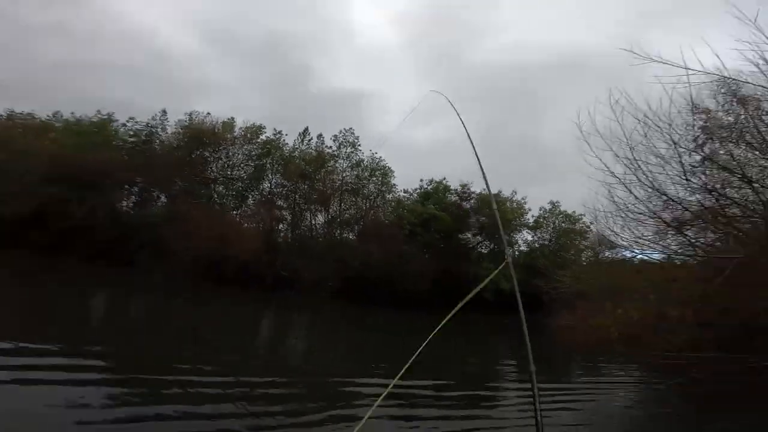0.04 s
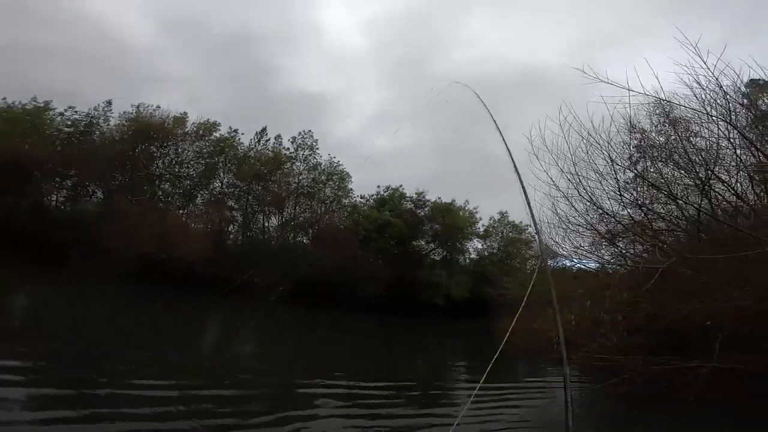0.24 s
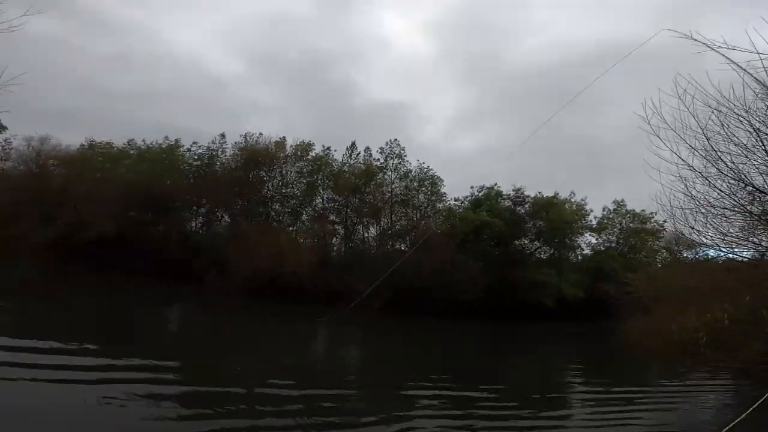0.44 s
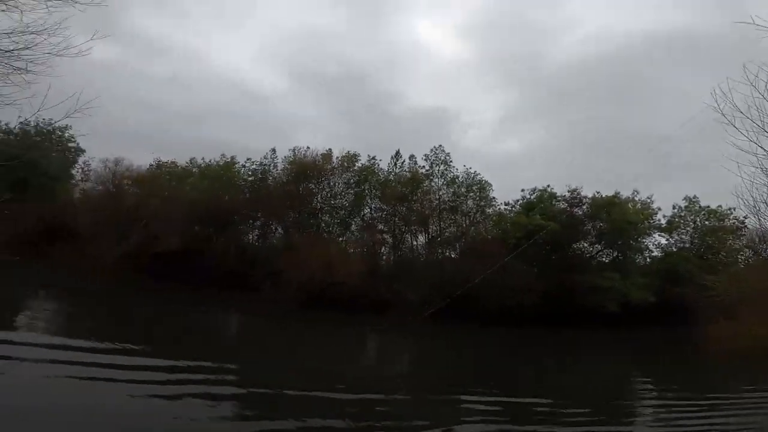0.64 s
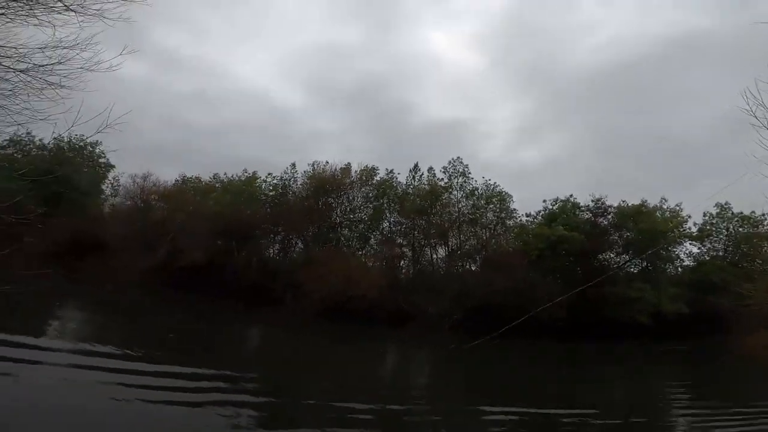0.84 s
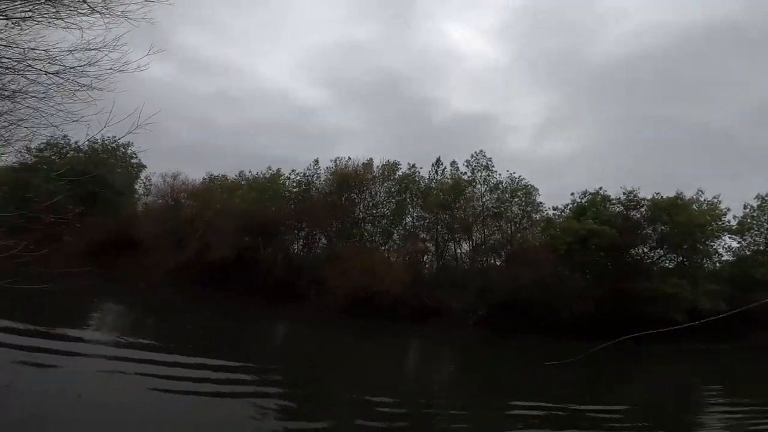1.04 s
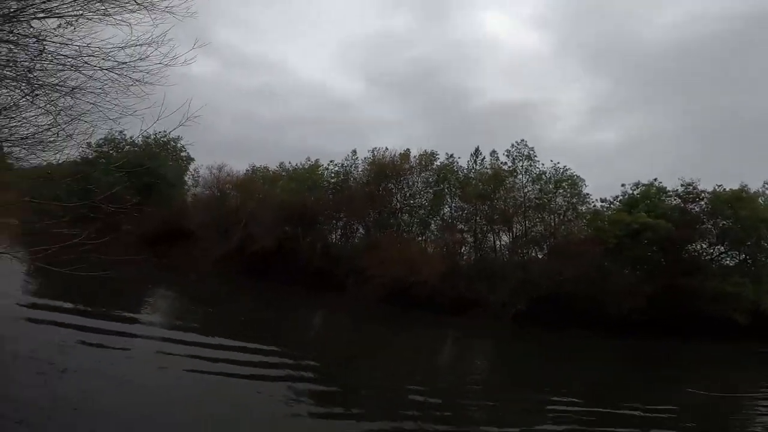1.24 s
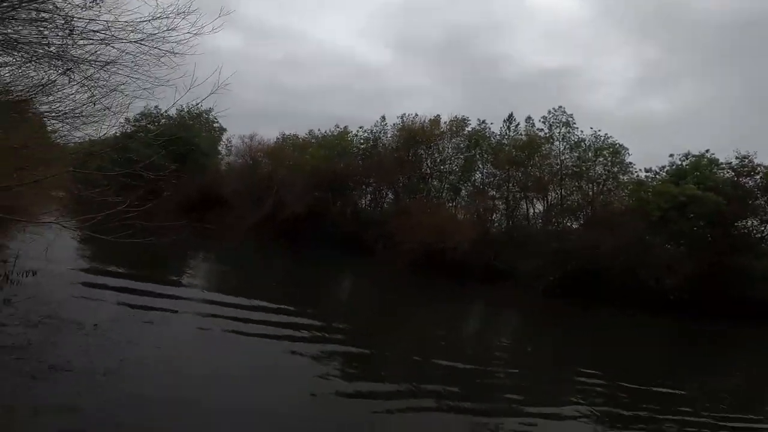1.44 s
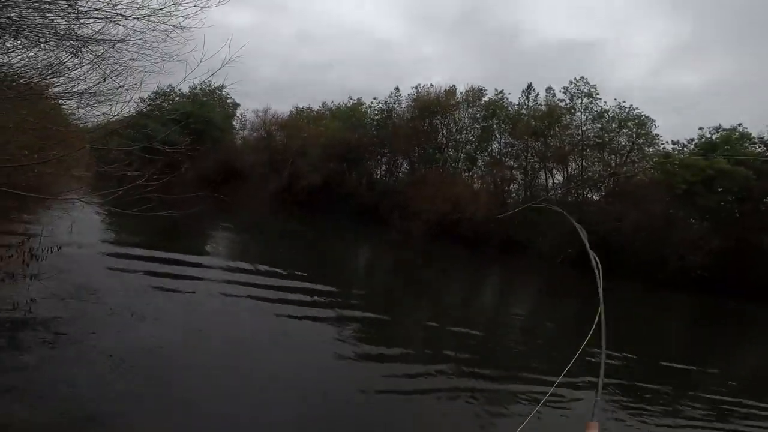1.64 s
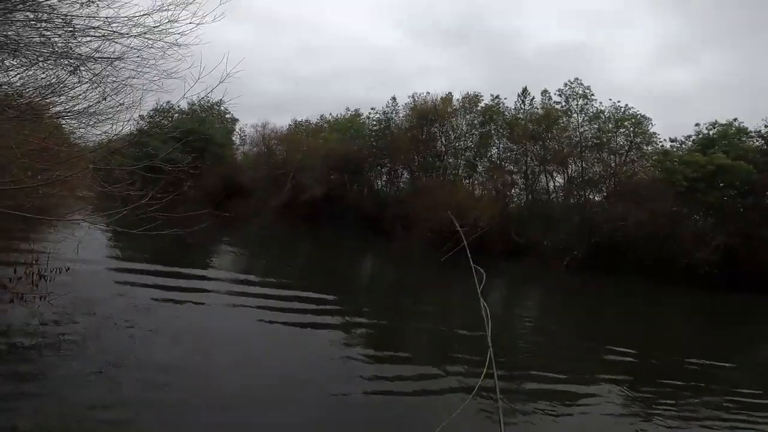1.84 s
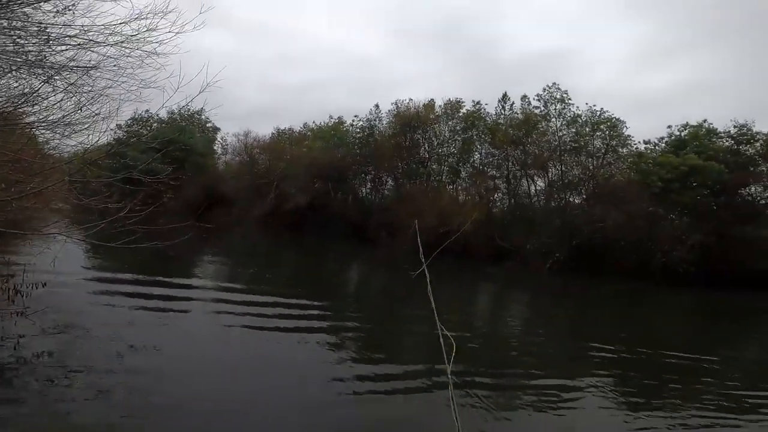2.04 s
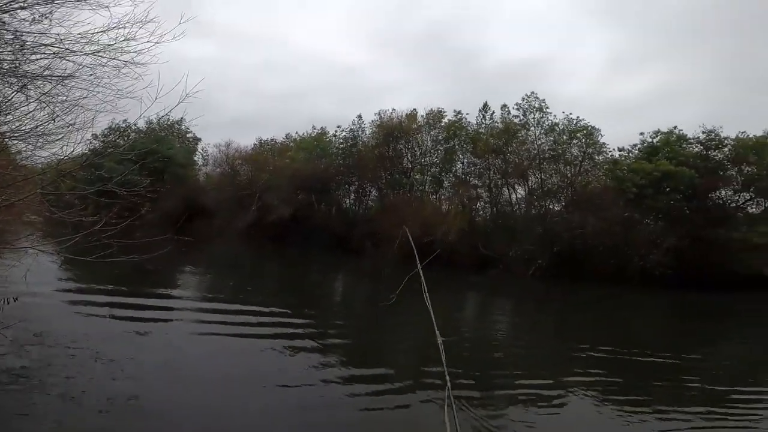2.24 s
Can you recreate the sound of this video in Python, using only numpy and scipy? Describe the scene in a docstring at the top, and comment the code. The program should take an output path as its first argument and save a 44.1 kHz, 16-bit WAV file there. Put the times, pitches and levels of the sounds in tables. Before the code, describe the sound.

A fly rod cast beside a river, heard from the angler's body. Soft line and sleeve rustles with fine crackles come in the first 0.5 s; low wind thumps and sharper ticks gather around 0.7-0.9 s. Lighter rustling follows from 1.1 s. The rod swishes at about 1.6 s, trailing a tiny rising whistle, then buffets, crackles and ticks fade by 2.3 s over steady quiet wash.

```python
"""A fly cast on a river bank, heard at two microphones worn by the angler.
The river washes steadily, as shaped noise, while air buffets the microphones with low noise and eddy pulses.
From the start line and sleeve rustle in strokes of grainy hiss, with fine crackles and damped, ringing ticks.
Then the rod swishes forward, a broad burst of noise, and narrow bands of noise whistle upward after it.
More crackles, ticks and strokes follow the cast."""
import sys
import numpy as np
from scipy import signal
from scipy.fft import rfft, irfft
from scipy.io import wavfile
from scipy.ndimage import uniform_filter1d, map_coordinates

SR = 44100
rng = np.random.default_rng(int(sys.argv[2]) if len(sys.argv) > 2 else 0)


def to_wav(s):
    """Save 16-bit WAV."""
    ch = np.atleast_2d(s).T  # columns
    pcm = np.round(np.clip(ch, -1, 1) * 32767)  # PCM
    wavfile.write(sys.argv[1], SR, pcm.astype(np.int16))


N = 101429  # length in samples

# Left-right correlation of close sounds. Each row: frequency in Hz, correlation from -1 to 1.
NEAR_CORRELATION = [(200, 0.7), (700, 0.94), (1500, 0.34), (3100, 0.58), (6800, 0.19), (10000, 0.18),
                    (14000, 0)]


def amp(db):
    """Amplitude ratio: 20 dB is a factor of ten."""
    return 10 ** (np.asarray(db) / 20)


def unit(x):
    """Normalisation: scales to a root mean square of 1."""
    return x / np.sqrt(np.mean(x ** 2) + 1e-20)


def read(points, hz):
    """Interpolates a curve along logarithmic frequency, as pitch is heard."""
    f, value = np.transpose(points)
    return np.interp(np.log(hz + 1), np.log(f + 1), value)


def pan(db):
    """Intensity panning: left and right gains of constant power, from the left-right difference in dB."""
    gains = np.array([amp(db / 2), amp(-db / 2)])
    return gains / np.sqrt(np.mean(gains ** 2, 0))


def add(mix, s, sound):
    """Superposition: adds a stereo sound to the mix from a time in seconds."""
    part = mix[:, max(round(s * SR), 0):][:, :sound.shape[1]]
    part += sound[:, :part.shape[1]]


def grid(size):
    """Short-time analysis: frame times in seconds (a column) and frequencies in Hz."""
    hop = size // 4
    return np.arange(N // hop + 5)[:, None] * hop / SR, np.fft.rfftfreq(size, 1 / SR)


def noise(field, correlation):
    """Short-time synthesis: random spectra give stereo noise whose rms follows a field of time and frequency."""
    size = 2 * (field.shape[-1] - 1)
    a, b, c, d = rng.standard_normal((4,) + field.shape[-2:])
    left, independent = a + 1j * b, c + 1j * d
    correlation = np.clip(correlation, -1, 1)
    right = correlation * left + np.sqrt(1 - correlation ** 2) * independent
    spectra = (np.array([left, right]) * field).swapaxes(1, 2)
    sound = signal.istft(spectra, nperseg=size, noverlap=size - size // 4)[1][:, :N]
    return sound * np.sqrt(3 / size)  # a flat field of 1 gives an rms of 1


def grain(shape, flicker_db, patch_db):
    """Amplitude modulation of hiss: quick flicker across all bands, and small patches of time and frequency."""
    patches = uniform_filter1d(rng.standard_normal(shape), size=6, axis=0)
    patches = uniform_filter1d(patches, size=5, axis=1)
    flicker = rng.standard_normal((shape[0], 1))
    return amp(flicker_db * flicker + patch_db * unit(patches))


def river():
    """Stationary broadband noise: wash of water and trees over a low outdoor rumble."""
    # Spectrum of the wash. Each row: frequency in Hz, relative density in dB per Hz.
    wash = [(30, 4.5), (110, 5.5), (190, 3.5), (250, -4.5), (335, -6.5), (365, -10), (390, -1), (420, -6),
            (700, -10.5), (1300, -7.5), (2000, -15.5), (4000, -21), (5500, -24.5), (7700, -32.5),
            (8400, -38), (11000, -40), (15000, -59)]
    # Left-right correlation. Each row: frequency in Hz, correlation from -1 to 1.
    likeness = [(50, 0.71), (150, 0.96), (400, 0.89), (1400, 0.74), (3100, 0.38), (6800, 0.078),
                (14000, -0.74)]
    level_db, side_db = -44.5, 1.2
    t, hz = grid(size=1024)
    field = amp(level_db) * unit(amp(read(wash, hz))) * np.ones_like(t)
    return noise(field, read(likeness, hz)) * pan(side_db)[:, None]


def buffeting():
    """Turbulent pressure at each microphone: stronger flow shifts the spectrum upward."""
    # Air flow. Each row: time in seconds, level in dB before the gain, left-right difference in dB.
    flow_course = [(0.0, -46.5, 2.5), (0.25, -34.5, -5), (0.4, -40, 5), (0.46, -34.5, -14.5),
                   (0.57, -29.5, -6), (0.6, -32, -5), (0.64, -37.5, 1), (0.8, -30, -9), (0.82, -26, -15),
                   (0.85, -31, -4.5), (1.04, -40, 2), (1.18, -40.5, -6), (1.23, -30, 4), (1.29, -29, -5),
                   (1.32, -40.5, 3), (1.41, -34.5, 4), (1.54, -30.5, 4), (1.6, -26, 0), (1.635, -26, 1),
                   (1.68, -36, 8), (1.72, -28.5, -5), (1.79, -31, 3.5), (1.85, -25.5, 10), (1.93, -26, 7.5),
                   (1.96, -25, 4), (2.0, -31, 5), (2.05, -31, 4), (2.081, -37.5, 3.5), (2.22, -48.5, 1),
                   (2.26, -38.5, 1.5), (2.3, -46, -3)]
    # Spectrum at the reference level. Each row: frequency in Hz, relative density in dB per Hz.
    rumble = [(10, -14), (25, 0.5), (55, 3), (90, -0.5), (150, -8), (230, -18.5), (400, -36.5), (900, -80),
              (3000, -99)]
    gain_db = 2.5
    shift_oct_per_db, reference_db = 0.053, -25
    s, db, side = np.transpose(flow_course)
    t, hz = grid(size=2048)
    stretch = 2 ** (shift_oct_per_db * (np.interp(t, s, db) - reference_db))
    correlation = read([(50, -0.17), (130, 0.28), (300, 0.57)], hz)
    flow = noise(amp(read(rumble, hz / stretch)), correlation)
    flow /= np.sqrt(uniform_filter1d(flow ** 2, size=3000, axis=1) + 1e-20)  # even out the running power
    now = np.arange(N) / SR
    return flow * amp(np.interp(now, s, db) + gain_db) * pan(np.interp(now, s, side))


def eddies():
    """Pressure pulses of single eddies: a cosine under a Gaussian, some reaching one microphone first."""
    # Each row: time in seconds, peak in dB before panning, centre frequency in Hz,
    # left-right difference in dB, Gaussian half length in cycles, delay of left after right in seconds.
    pulses = [(0.216, -27, 102, -19, 0.6, 0), (0.517, -25.5, 109, -12, 0.49, 0),
              (.597, -20.5, 44.8, -20, 0.48, -0.0017), (.735, -23.5, 58.6, -4, .5, 0.0037),
              (0.824, -15, 51.6, -2, 0.54, 0), (.8365, -16, 144, -30, 0.46, 0.00044),
              (1.236, -22, 45, 2, 0.56, .003), (1.251, -25.5, 210, 2, 0.38, -0.00011),
              (1.265, -19.5, 122, -29, 0.39, 0), (1.281, -20.5, 48, -18, 0.52, 0.0013),
              (1.585, -23.5, 140, 2, .5, .001), (1.636, -30, 317, -1, 1.3, .0004),
              (1.712, -18, 130.6, 1, 0.58, -0.0036), (1.727, -18.5, 52, -21, 0.72, -0.00032),
              (1.7565, -12, 236, -0.5, 0.34, .001), (1.7564, -16.5, 45.3, -5, 0.44, 0.001),
              (1.852, -24, 159, 5, 0.66, .001), (1.938, -17.5, 177, 5, 0.78, -0.00029)]
    out, t = np.zeros((2, N)), np.arange(N) / SR
    for s, db, hz, side, cycles, lag in pulses:
        turns = (t - s - np.array([[lag], [-lag]]) / 2) * hz
        swing = np.exp(-(turns / cycles) ** 2 / 2) * np.cos(2 * np.pi * turns)
        out += pan(side)[:, None] * amp(db) * swing
    return out


def rustles():
    """Sliding friction of line and sleeve: grainy noise that rises, holds and decays exponentially."""
    # Each row: start in seconds, attack in seconds, time from start to release in seconds,
    # level in dB before the grain, left-right difference in dB, spectral tilt in dB per octave.
    strokes = [(-.06, 0.032, 0.14, -48, -0.5, 1.1), (0.09, 0.05, 0.11, -49, 3.5, -2.5),
               (0.234, .03, 0.15, -51.5, 2.5, -1.5), (0.348, 0.028, 0.037, -50.5, 4, 5),
               (0.4, 0.03, 0.072, -54.5, 2, 5), (0.687, 0.044, 0.085, -48.5, 3, 1.5),
               (0.766, 0.035, 0.059, -47.5, 3.5, 2), (0.843, 0.061, 0.065, -48, 4, 1.5),
               (1.134, 0.081, 0.14, -50.5, 2.5, -2), (1.274, 0.06, 0.31, -57.5, 7, 1.5),
               (1.441, .16, 0.3, -48, 2.5, 4), (1.728, 0.027, 0.23, -46.5, 1, 2.5),
               (1.953, 0.076, 0.14, -48.5, -0.5, 1.5), (2.105, 0.037, 0.11, -50.5, 0, 3.5),
               (2.235, .04, .08, -51.5, 2.5, 4.5)]
    # Spectrum before the tilt. Each row: frequency in Hz, relative density in dB per Hz.
    friction = [(200, -14.5), (600, 8), (1300, 2), (2800, 2), (4000, -0.5), (5200, -2), (6300, -7),
                (7700, -11), (8400, -19), (10000, -20), (12500, -32), (15000, -38.5)]
    release_s = 0.045
    t, hz = grid(size=256)
    power = 0
    for start, attack, length, db, side, tilt_db in strokes:
        rise = np.sin(np.pi / 2 * np.clip((t - start) / attack, 0, 1)) ** 2
        decay = np.exp(-np.maximum(t - start - length, 0) / release_s)
        colour = unit(amp(read(friction, hz) + tilt_db * np.log2(hz + 1)))
        power = power + (pan(side)[:, None, None] * amp(db) * rise * decay * colour) ** 2
    field = np.sqrt(power) * grain(power.shape[1:], flicker_db=1.1, patch_db=2)
    return noise(field, read(NEAR_CORRELATION, hz))


def crackles():
    """Stick-slip: cloth fibres catch and let go at random moments, each a tiny damped ring."""
    # Each row: start in seconds, length in seconds, crackles per second,
    # base level in dB before the random spread, mean left-right difference in dB.
    bursts = [(0.05, .22, 520, -41.5, -8), (1.758, .28, 260, -39.5, 13)]
    low_hz, high_hz = 1400, 5650
    decay_s, spread_db = 0.0004, 2.5
    out, t = np.zeros((2, N)), np.arange(300) / SR
    for start, length, rate, db, side in bursts:
        for when, pitch, size, place in rng.random((int(rate * length), 4)):
            hz = low_hz * (high_hz / low_hz) ** pitch
            envelope = t / decay_s * np.exp(-t / decay_s)  # peaks at 1/e
            ring = np.sin(2 * np.pi * hz * t) * envelope
            gain = amp(db + spread_db * (2 * size - 0.5))
            gains = gain * pan(side + 10 * (place - 0.5))[:, None]
            add(out, start + when * length, gains * ring)
    return out


def ticks():
    """Impact of line on rod: a heavily damped resonance with a short scatter of noise."""
    # Each row: time in seconds, peak of the ring's envelope in dB before panning, ring frequency in Hz,
    # left-right difference in dB, initial scatter level in dB relative to that peak.
    taps = [(0.138, -33.5, 2600, -4, -8), (0.363, -37, 5300, -16, -14), (.485, -36, 1720, 18, -17),
            (0.7317, -25.5, 1750, 9, -18), (0.8139, -23, 1520, 6, -20), (0.853, -32, 1150, 11, -20),
            (1.684, -26.5, 1900, 14, -22), (1.900, -28.5, 1800, 15, -20), (1.930, -29, 1410, 10, -21),
            (2.152, -38.5, 6500, -12, -17), (2.194, -36, 4700, 2, -9)]
    ring_decay_s, scatter_decay_s = 0.00023, 0.0073
    out, t = np.zeros((2, N)), np.arange(1500) / SR
    band = signal.butter(3, [900, 5500], "band", fs=SR, output="sos")
    for s, db, hz, side, scatter_db in taps:
        envelope = t / ring_decay_s * np.exp(1 - t / ring_decay_s)  # peaks at 1
        ring = np.sin(2 * np.pi * hz * t) * envelope
        hiss = unit(signal.sosfilt(band, rng.standard_normal((2, len(t)))))
        scatter = hiss * amp(scatter_db) * np.exp(-t / scatter_decay_s)
        add(out, s, amp(db) * pan(side)[:, None] * (ring + scatter))
    return out


def cast():
    """Aerodynamic noise: the rod's sweep swishes broadly, and shed air whistles in gliding narrow bands."""
    # Spectrum of the swish. Each row: frequency in Hz, relative density in dB per Hz.
    swish = [(100, 15.5), (300, 5), (480, 2.5), (1000, -1), (1800, 2), (3200, 0.5), (5000, -5.5),
             (7700, -9.5), (8500, -16.5), (10500, -23), (15000, -36)]
    # Air shed from rod and line. Each row: middle in seconds, half length in seconds,
    # pitch at the middle in Hz, glide in octaves per second, level at the middle in dB before the grain.
    whistles = [(1.677, 0.014, 920, 8, -43.5), (1.699, 0.005, 1830, 5, -44),
                (1.699, 0.0089, 3260, 16, -37.5), (1.714, 0.011, 2680, 3, -43),
                (1.717, 0.006, 4900, 8, -48), (1.787, 0.0089, 2780, 2, -48.5)]
    top_speed_s, rise_s, fall_s = 1.637, 0.032, 0.057
    swish_db, width_oct = -34.5, 0.15  # swish level at top speed, whistle half width
    t, hz = grid(size=512)
    spread = np.where(t < top_speed_s, rise_s, fall_s)
    speed = np.exp(-((t - top_speed_s) / spread) ** 2 / 2)
    power = (amp(swish_db) * speed * unit(amp(read(swish, hz)))) ** 2
    for s, half, pitch, glide, db in whistles:
        octaves = np.log2((hz + 1) / pitch)
        band = np.exp(-((octaves - glide * (t - s)) / width_oct) ** 2)
        band_mean = np.mean(np.exp(-(octaves / width_oct) ** 2))
        swell = np.exp(-((t - s) / half) ** 2)
        power = power + amp(db) ** 2 * swell * band / band_mean
    field = np.sqrt(power) * grain(power.shape, flicker_db=1.2, patch_db=1.6)
    return noise(field, read(NEAR_CORRELATION, hz)) * pan(0.34)[:, None]


def scene():
    """Superposition in a free field, with no reverberation."""
    near_lag_s = 0.00003  # close sounds reach the right microphone first
    left, right = rustles() + crackles() + cast() + ticks()
    left = map_coordinates(left, [np.arange(N) - near_lag_s * SR], order=5)
    return river() + buffeting() + eddies() + np.array([left, right])


def record(dry):
    """Linear filtering: the two microphone ports differ in the treble, then a low-pass limits the band."""
    # Port balance. Each row: frequency in Hz, left-right difference in dB.
    port_balance = [(1200, 0), (2200, 1.7), (3300, 2.5), (4300, 0.5), (5300, -4), (6500, -6), (8000, -1.5),
                    (12000, 2.5)]
    cutoff_hz = 15500
    port_gains = pan(read(port_balance, np.fft.rfftfreq(N, 1 / SR)))
    coloured = irfft(rfft(dry) * port_gains, N)
    low_pass = signal.firwin(401, cutoff_hz, window=("kaiser", 9), fs=SR)
    return signal.oaconvolve(coloured, low_pass[None], "same")


dry = scene()
out = record(dry)
to_wav(out)
```